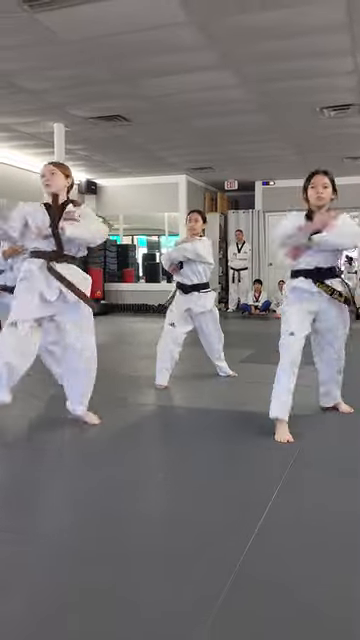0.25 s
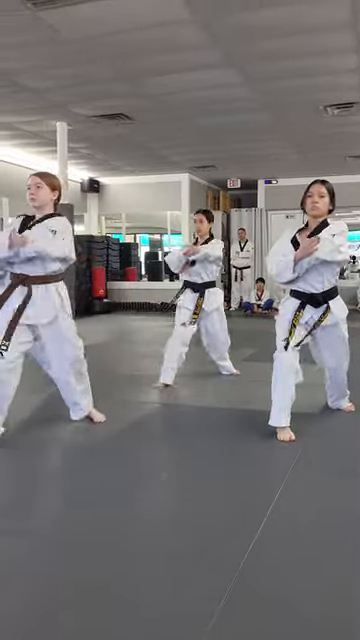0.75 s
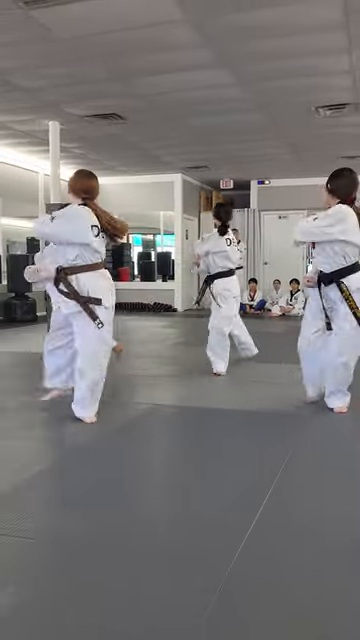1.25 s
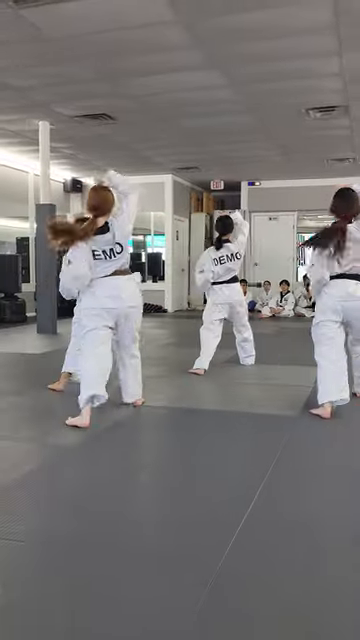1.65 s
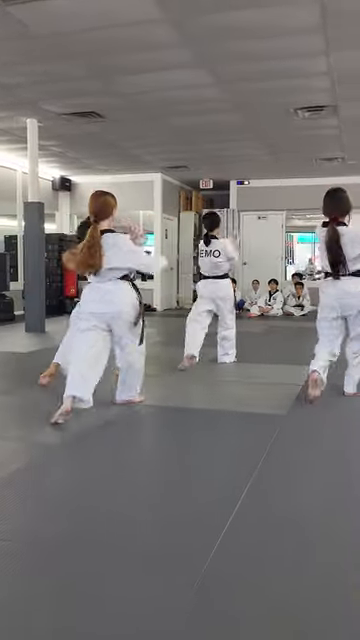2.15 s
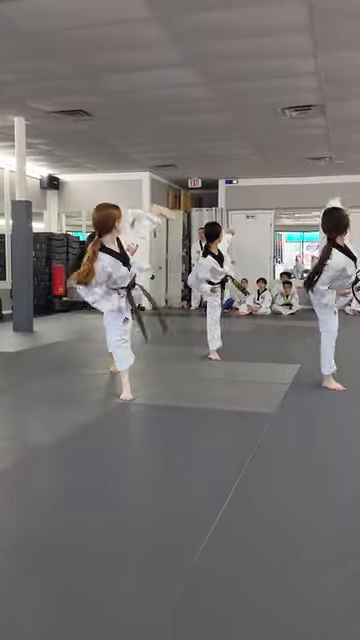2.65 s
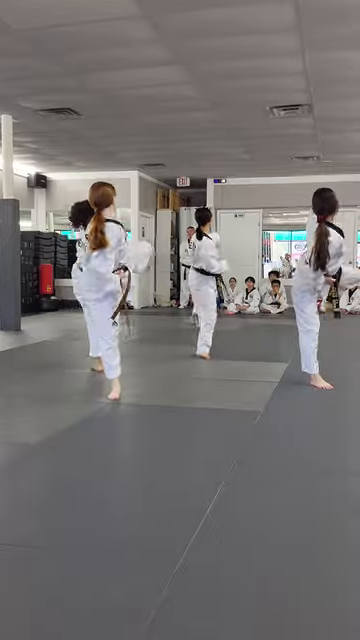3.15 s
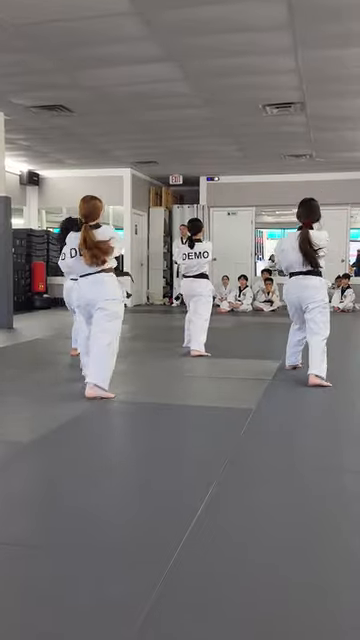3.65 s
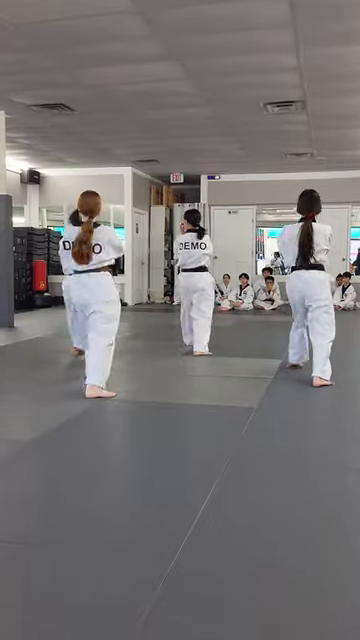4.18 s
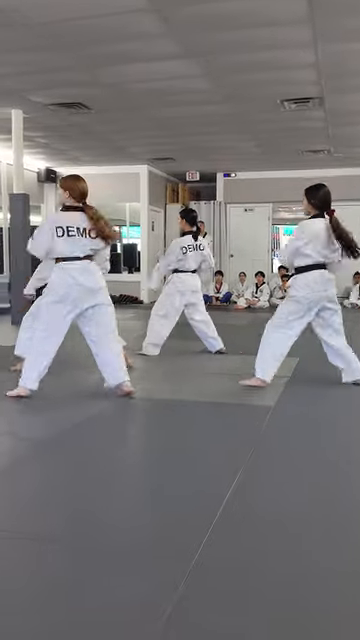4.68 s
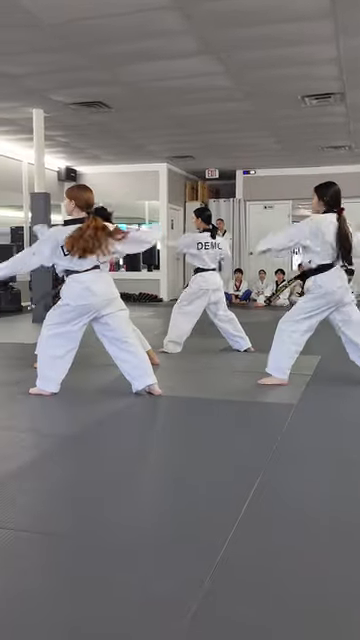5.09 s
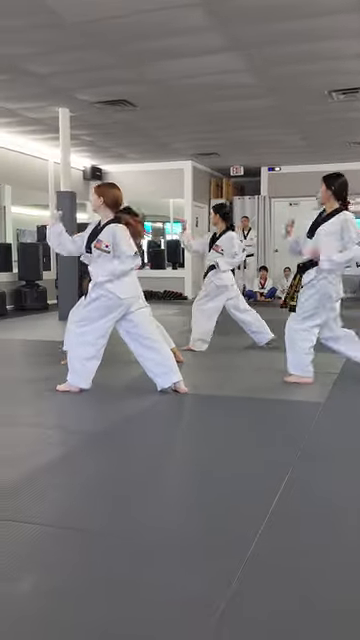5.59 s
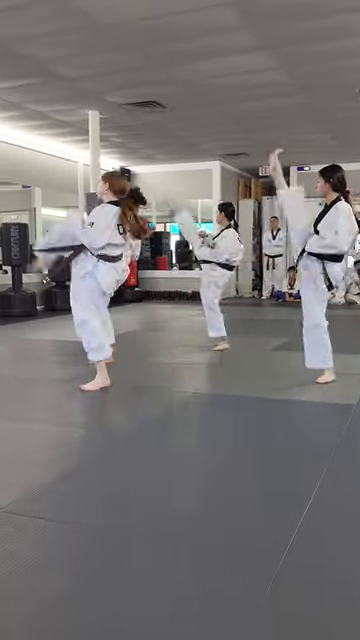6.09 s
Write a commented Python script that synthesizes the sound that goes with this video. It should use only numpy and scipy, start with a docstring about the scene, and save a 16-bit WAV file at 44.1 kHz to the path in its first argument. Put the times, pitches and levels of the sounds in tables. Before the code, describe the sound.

Fabric snaps, hollow pops and barefoot thuds burst twice amid softer swishes and rustles, over faint ventilation rumble in a moderately echoing gym.

```python
"""A light stir of cloth comes first, then a burst of cloth cracks, hollow pops and foot thuds.
A group drills kicks and steps barefoot on a foam mat in a low gym, a few metres from a phone.
Cloth is coloured random ticks, heels ring damped floor modes, pops are single damped rings.
Decaying noise bands make the gym; filtered noise and a wavering tone make the ventilation.
Two microphone ports colour it all; the right one rings near 6 kHz."""
import sys
import numpy as np
from scipy import signal
from scipy.fft import rfft, irfft
from scipy.io import wavfile
from scipy.ndimage import uniform_filter1d

SR = 44100
rng = np.random.default_rng(int(sys.argv[2]) if len(sys.argv) > 2 else 0)


def unload_audio(sound):
    """Save the sound as a 16-bit wav file, at the path given as the first command line argument."""
    columns = np.transpose(np.atleast_2d(sound))
    # keep every value between -1 and 1, then stretch to whole-number steps
    steps = np.round(np.clip(columns, -1, 1) * 32767)
    wavfile.write(sys.argv[1], SR, steps.astype(np.int16))


N = 279132
T = np.arange(N) / SR  # time axis in s

# kicks, turns and strides of the group: (peak time [s], build-up [s], dying away [s],
# crisp rustle [dB], heavy flap [dB], floor shuffle [dB])
MOVES = [(0.22, 0.055, 0.22, -43, -28.5, -49), (0.36, 0.17, 0.2, -35.5, -33.5, -33.5),
         (0.98, 0.28, 1, -55, -55.5, -50), (1.36, 0.17, 0.19, -48.5, -59.5, -62),
         (1.64, 0.26, 0.19, -44, -42.5, -44), (2.0, 0.081, 0.27, -55, -57.5, -66),
         (2.26, 0.61, 0.28, -53, -50.5, -54), (2.63, 0.59, 0.2, -45.5, -45.5, -43.5),
         (3.42, 0.2, 0.049, -50.5, -72, -47), (3.636, 0.23, 0.26, -38.5, -31.5, -35.5),
         (4.34, 0.23, 0.35, -51, -53.5, -66), (4.8, 0.18, 0.22, -47.5, -39, -38),
         (5.28, .17, 0.47, -47.5, -44, -40.5), (5.73, 0.083, 1, -54, -52, -58),
         (6.06, 0.48, 0.75, -46.5, -43.5, -38.5)]
# background stir of cloth under the moves, rising and falling: (time [s], crisp rustle [dB],
# airy rustle [dB], heavy flap [dB])
STIR = [(0, -55.5, -65, -61), (.5, -76, -81, -69), (.85, -54.5, -67, -83), (.95, -57.5, -69, -64),
        (1.8, -60, -67, -77), (2.8, -60.5, -74, -55.5), (3.3, -57.5, -61.5, -57.5), (3.95, -62, -85, -106),
        (4.2, -61.5, -70, -59.5), (4.55, -84, -78, -76), (5.1, -59, -71, -86), (5.62, -58, -67, -79),
        (6.33, -63, -63, -59)]
# sleeves and legs sweeping close by: (time [s], level [dB], body against rustle [dB],
# air against rustle [dB], length [s])
SWISHES = [(0.083, -48, -2, -6, 0.15), (1.051, -46.5, -2.5, -3.5, 0.14), (1.144, -37, -22, -7, 0.061),
           (1.265, -53.5, -6, 1, 0.19), (1.51, -37.5, -10, -9, 0.13), (2.279, -38, -14, 0, 0.057),
           (2.609, -54, 17, -14, 0.25), (4.29, -39.5, -31, -10, 0.026), (4.351, -44.5, -35, -9, 0.13),
           (4.587, -41.5, -3, -9, 0.27), (5.172, -55, 16, -21, 0.31), (5.952, -48, 10.5, -15, 0.21),
           (6.205, -48.5, 14, -17, 0.14)]
# cloth pulled taut or slapped: (time [s], crack peak [dB], body against crack [dB], body pitch [Hz],
# length [s])
SNAPS = [(0.19, -15, 6.5, 1890, 0.0041), (0.25, -27, 9, 980, 0.013), (0.314, -25, -24, 563, 0.012),
         (0.3567, -10.5, -3, 1520, 0.0059), (0.39, -18, 4, 1660, 0.0037), (0.399, -29, 6, 1160, 0.0044),
         (1.566, -26, -27, 820, 0.0066), (1.621, -26, -24, 615, 0.0033), (2.089, -32.5, -16, 536, 0.004),
         (2.17, -35.5, -24, 590, 0.0071), (3.015, -39.5, -15, 605, 0.0061),
         (3.472, -22.5, -1.5, 900, 0.0076), (3.493, -29.5, 1, 503, 0.01), (3.507, -25, -20, 773, 0.0037),
         (3.517, -24.5, -21, 773, 0.008), (3.5775, -23.5, 1.5, 2300, 0.003),
         (3.583, -21.5, 1, 1400, 0.0047), (3.677, -13.5, -0.5, 1720, 0.007), (3.687, -16.5, 0, 605, 0.0075),
         (3.713, -23, -7, 700, 0.034), (4.72, -39.5, 1.5, 770, 0.018), (5.715, -49, 8.5, 497, 0.035),
         (5.996, -43, 8, 590, 0.022), (6.024, -46, 18, 1080, 0.0052), (6.041, -44.5, 13, 2180, 0.004)]
# air trapped in a fold of cloth or under a sole: (time [s], starting level [dB], starting pitch [Hz],
# t60 [s])
POPS = [(0.191, -19.5, 254, 0.047), (0.205, -19, 466, 0.072), (0.275, -20.5, 352, 0.066),
        (0.316, -16.5, 260, 0.083), (0.359, -16.5, 671, 0.06), (0.392, -18, 696, 0.042),
        (2.682, -31, 753, 0.081), (3.057, -40.5, 768, 0.031), (3.22, -47, 533, 0.16),
        (3.373, -25, 297, 0.024), (3.458, -41, 1170, .04), (3.578, -11.5, 1230, 0.0092),
        (3.686, -20, 400, 0.031), (5.275, -29, 600, 0.035), (5.392, -36, 1070, .025),
        (5.909, -36, 1150, .025), (2.706, -31.5, 810, 0.035)]
# feet landing: (time [s], thud peak [dB], slap against thud [dB], boost of the deepest floor mode [dB])
STEPS = [(0.187, -35, 16, 1), (0.358, -26.5, 9, 9), (0.399, -26.5, 6.5, -2), (1.337, -45.5, -22, 16),
         (1.659, -34, -3, 10.5), (2.271, -40.5, -2.5, 8), (2.656, -29, -0.5, 13), (2.699, -36.5, 1, -1),
         (3.374, -39.5, -9, 1), (3.485, -27, 3, -5), (3.682, -24.5, 5, 5), (4.659, -48, 11, -2),
         (4.79, -35.5, -26, 3), (5.239, -42, 6.5, 11), (5.703, -38, -3, 18), (5.846, -40, -20, 20),
         (6.019, -31, -16, 15), (6.228, -43.5, 8, 8)]
# resonances of the floor: (mean frequency [Hz], level [dB], t60 [s])
FLOOR_MODES = [(70, -8, 0.16), (80.8, -14.5, 0.52), (112.4, -3.5, 0.16), (176.1, -6, 0.17),
               (244.5, -3, 0.15), (298, -7, 0.12)]
# spectrum of scraping fibres: (frequency [Hz], level [dB])
CRISP = [(900, -13.5), (2200, -8), (3500, -6.5), (5000, -3.5), (8800, 3.5), (10500, -1.5), (13000, -35.5)]
# spectrum of the highest, airy rustle: (frequency [Hz], level [dB])
AIRY = [(8500, -37), (10500, 0), (12500, 6), (16000, 9.5)]
# spectrum of flapping cloth, also of the sole's slap: (frequency [Hz], level [dB])
FLAP = [(40, -64), (120, -10), (250, -1), (420, -6), (720, -6.5), (900, -9.5), (1300, -14), (2200, -18.5),
        (4500, -27), (7000, -37.5)]
# spectrum of creasing cloth: (frequency [Hz], level [dB])
CRUMPLE = [(600, -18), (1500, -1.5), (3500, -11.5)]
# spectrum of soles dragging on the mat: (frequency [Hz], level [dB])
SHUFFLE = [(20, -45), (45, -26.5), (65, 5), (120, -4), (200, -5), (350, -34.5)]
# unevenness of the flap: (depth [dB], changes per second [1/s])
FOLDS = (3.7, 22)
# reverberation time of the gym: (frequency [Hz], t60 [s])
GYM_T60 = [(100, 1), (300, 0.4), (1000, 0.51), (4000, 0.57), (7000, 0.15), (12000, 0.2)]
# spectrum of the duct rumble: (frequency [Hz], level [dB])
VENT = [(20, -3), (45, -5), (70, 3), (120, 2), (165, -14.5), (400, -36.5), (1000, -38), (3000, -49),
        (16000, -59)]
# the hum swells and fades: (time [s], level [dB])
HUM = [(0.0, -57.5), (0.41, -47), (0.65, -68), (1.95, -50), (2.1, -56), (3.49, -59), (3.61, -62),
       (4.32, -64), (6.33, -52)]
# response of the microphone ports: (frequency [Hz], left [dB], right [dB])
PORTS = [(2500, 2, 2), (4520, 2, 7.5), (5040, -0.5, 10.5), (6180, -4, 15.5), (7970, -4.5, 6),
         (8770, -29, -3), (8960, -4, -5), (10600, -15, -0.5), (13300, -8, 2), (15800, -45, -7)]

MOVE_RANGE_DB = 20  # level change over the build-up and over the dying away
MOVE_ROUND = 1.273  # exponent; over 1: a fuller crest and a quicker end
MOVE_AIR_DB = -8.5  # airy rustle against crisp rustle
STIR_SHUFFLE_DB = -63
CRUMPLE_DB = -17  # creasing cloth against heavy flap
SNAP_AIR_DB = -28  # air against crack
VENT_DB, HUM_HZ = -51.5, 117.4  # rumble level before the ports; centre of the wavering hum
PORT_GAP_M = 0.172
OFF_AXIS = .12  # sine of the bearing of the places on the mat
SOUND_SPEED = 343  # m/s
CEILING = .85  # saturation level, full scale = 1
TOP_HZ = 15850


def movement():
    """Friction noise as dense random impulses: fibres scrape, cloth flaps and creases, soles drag."""
    s, rise, fall, *peaks = columns(MOVES)
    from_peak = np.maximum((s - T) / rise, (T - s) / fall)
    power_shape = undb(-MOVE_RANGE_DB * from_peak ** MOVE_ROUND) ** 2
    moves = undb(np.hstack(peaks).T) ** 2 @ power_shape  # power of each layer

    # unrelated sounds add in power
    stir_s, *stir_levels = np.transpose(STIR)
    stir, stir_air, stir_flap = (undb(np.interp(T, stir_s, db)) ** 2 for db in stir_levels)
    crisp = np.sqrt(moves[0] + stir)
    airy = np.sqrt(moves[0] * undb(MOVE_AIR_DB) ** 2 + stir_air)
    flap = np.sqrt(moves[1] + stir_flap)
    shuffle = np.sqrt(moves[2] + undb(STIR_SHUFFLE_DB) ** 2)

    fibres = grains((2, N), rate=20000, spread_db=0.0) * undb(2.66 * walk(21.86))
    folds = grains((2, N), rate=2500, spread_db=1.5) * undb(1.7 * walk(25))
    creases = grains((2, N), rate=900, spread_db=2.0)
    soles = grains((2, N), rate=400, spread_db=-2.0)

    out = crisp * texture(fibres, CRISP, 3500, 9000)
    out = out + airy * texture(fibres, AIRY, 9500, 15500)
    out = out + flap * clumps(texture(folds, FLAP, 250, 1500), *FOLDS)
    out = out + flap * undb(CRUMPLE_DB) * texture(creases, CRUMPLE, 900, 3000)
    return out + shuffle * texture(soles, SHUFFLE, 45, 200)


def swishes():
    """Amplitude-modulated fibre noise rises and decays with each sweep, too near for much reverberation."""
    size = SR // 3
    s, level_db, body_db, airy_db, length = columns(SWISHES)
    phase = np.minimum(T[:size] / np.clip(length, .005, .3), 1)
    late = np.minimum(0.28 + 1.96 * length, 1)  # a flick starts sharply, a long sweep builds up
    envelope = np.sin(np.pi * phase ** late) ** 2 * np.exp(-phase)
    sides = []
    for _ in range(2):
        ticks = grains((len(s), size), rate=13000, spread_db=0.0)
        sweep = cloth(ticks, colour(ticks, FLAP), body_db, airy_db, np.std) * envelope
        sides.append(lay(s[:, 0], undb(level_db) * sweep, count=1)[0])
    return diffuse(np.array(sides)) * undb(2.7 * walk(60))  # the brushing is uneven


def snaps(tails):
    """Impulsive radiation: a short run of ticks gives a bright crack and a duller body of displaced air."""
    size = SR // 8
    s, peak_db, body_db, body_hz, length = columns(SNAPS)
    phase = T[:size] / np.clip(length, .002, .03)
    shape = np.minimum(phase / 0.9, 1) * np.exp(-phase ** 1.07)
    ticks, other = (grains((len(s), size), rate=8000, spread_db=2.0) * shape for _ in range(2))
    body = np.array([colour(x, body_spectrum(hz)) for x, hz in zip(ticks, body_hz[:, 0])])
    # a wide sheet of cloth cracks all over: each port hears other fibres, both hear the same body
    sides = []
    for side_ticks in (ticks, other):
        snap = cloth(side_ticks, body, body_db, SNAP_AIR_DB, row_peak)
        sides.append(lay(s[:, 0], undb(peak_db) * snap, len(tails)))
    left, right = sides
    return reverberate(left, tails, wet_db=-6.5, right=right)


def body_spectrum(hz):
    """Broad resonance of displaced air: a spectral maximum at hz falling off on both sides."""
    return [(hz / 12, -45), (hz / 3, -11), (hz / 0.89, -5), (hz, 0), (hz * 1.31, -5), (hz * 6, -16)]


def pops(tails):
    """Damped cavity oscillation: trapped air rings once, briefly, sagging a little in pitch."""
    t = T[:SR // 8]
    s, peak_db, hz, t60 = columns(POPS)
    tone = np.sin(2 * np.pi * hz * t * (1 - 1.64 * t))
    onset = np.minimum(t * hz / 0.8, 1)
    ring = tone * onset * undb(peak_db - 60 * t / np.maximum(t60, .01))
    places = lay(s[:, 0], ring, len(tails))
    return reverberate(places, tails, wet_db=-7.0, right=places)


def steps(tails):
    """Modal excitation: a soft heel push rings the floor's damped modes; the sole slaps the foam as noise."""
    t = T[:SR // 2]
    s, peak_db, slap_db, deep_db = columns(STEPS)
    ring = 0
    for k, (hz, db, t60) in enumerate(FLOOR_MODES):
        detune = rng.standard_normal((len(s), 1))  # every spot on the floor rings a little differently
        level = undb(db + deep_db * (k == 0) - 60 * t / t60)
        ring = ring + level * np.sin(2 * np.pi * hz * (1 + 0.056 * detune) * t)
    thud = colour(ring * np.minimum(t / 0.0086, 1), [(25, -23.5), (55, 5.0), (400, 8.0)])
    slap_shape = np.minimum(t / 0.0126, 1) * undb(-60 * t / 0.073)
    slap = colour(rng.standard_normal(thud.shape) * slap_shape, FLAP)
    thud, slap = (x / row_peak(x) for x in (thud, slap))
    places = lay(s[:, 0], undb(peak_db) * (thud + undb(slap_db) * slap), len(tails))
    return reverberate(places, tails, wet_db=-0.5, right=places)


def gym(count=3):
    """Exponential decay of a diffuse field: fading noise in octave bands, unit mean energy per place."""
    t, tail = T[:SR * 3 // 4], 0
    noise = np.array([diffuse(rng.standard_normal((2, len(t)))) for _ in range(count)])
    for hz in 63 * 2. ** np.arange(8):
        top = hz * np.sqrt(2) * (1 + .6 * (hz > 8000))  # the highest band is widened
        band = signal.butter(3, [hz / np.sqrt(2), top], "bandpass", fs=SR, output="sos")
        t60 = on_log(hz, GYM_T60, column=1)
        # each band reads the noise from its own start, so that neighbours do not cancel
        part = signal.sosfilt(band, np.roll(noise, int(hz), axis=-1))
        tail = tail + part * undb(-60 * t / t60) / np.sqrt(t60)
    tail = tail * np.clip((t - .003) / 0.0018, 0, 1)  # first reflections arrive after the direct sound
    # early echoes are separate and uneven, later ones blend
    uneven = np.array([walk(250)[:len(t)] for _ in range(count)])[:, None]
    tail = tail * undb(6.6 * uneven * np.exp(-t / 0.042))
    return tail / np.sqrt(np.mean(np.sum(tail ** 2, axis=-1)))


def reverberate(places, tails, wet_db, right):
    """Superposition of direct and reflected sound; right is what the right port gets directly."""
    wet = signal.fftconvolve(places[:, None], tails, axes=-1).sum(axis=0)[:, :N]
    # a place off to one side reaches one port first
    delay = round(OFF_AXIS * PORT_GAP_M / SOUND_SPEED * SR)
    lags = rng.choice([-1, 1], len(places)) * delay
    direct = [places.sum(axis=0), sum(np.roll(x, lag) for x, lag in zip(right, lags))]
    return np.array(direct)[:, :N] + undb(wet_db) * wet


def ventilation():
    """Broadband flow noise in the duct swells a little; the motor hum wavers in frequency and level."""
    air = diffuse(colour(rng.standard_normal((2, N)), VENT)) * undb(1.0 * walk(4.52))
    hum_phase = 2 * np.pi * np.cumsum(HUM_HZ + 5.0 * walk(12)) / SR
    hum_db = np.interp(T, *np.transpose(HUM)) + 4.65 * walk(16)
    hum = np.sqrt(2) * np.sin(hum_phase) * undb(hum_db)
    return air * undb(VENT_DB) / np.std(air) + hum


def cloth(ticks, body, body_db, airy_db, measure):
    """Spectral superposition: crisp rustle, body and air, each set to its level in its own band."""
    parts = [(colour(ticks, CRISP), 0, 3500, 9000),
             (body, body_db, 300, 2500),
             (colour(ticks, AIRY), airy_db, 9500, 15500)]
    total = 0
    for part, rel_db, lo_hz, hi_hz in parts:
        in_band = heard(part.ravel(), lo_hz, hi_hz).reshape(part.shape)
        total = total + undb(rel_db) * part / measure(in_band)
    return total


def texture(source, points, lo_hz, hi_hz):
    """Diffuse field of coloured grains from all over the mat, at unit level in the given band."""
    field = diffuse(colour(source, points))
    return field / np.std(heard(field, lo_hz, hi_hz))


def clumps(x, patchy_db, rate):
    """Independent modulation: third-octave bands swell and sink as folds of cloth open and close."""
    edges = 140 * 2 ** (np.arange(11) / 3)
    out = x
    for lo, hi in zip(edges[:-1], edges[1:]):
        band = signal.sosfilt(signal.butter(1, [lo, hi], "bandpass", fs=SR, output="sos"), x)
        gain = undb(patchy_db * walk(rate) - patchy_db ** 2 / 9)  # lowered to offset the swells
        out = out + band * (gain - 1)
    return out


def grains(shape, rate, spread_db):
    """Random point process: Gaussian ticks at rate per second, with an added random spread in dB."""
    struck = rng.random(shape) < rate / SR
    spread = undb(spread_db * np.minimum(rng.exponential(size=shape), 4))
    return struck * rng.standard_normal(shape) * spread


def walk(rate):
    """Slow random modulation: levels held 1 / rate s and slewed twice; spread near 1."""
    k = int(SR / rate)
    held = np.repeat(rng.standard_normal(N // k + 1), k)
    return 1.3 * uniform_filter1d(uniform_filter1d(held, k), k)[:N]


def diffuse(pair):
    """Spatial coherence: two unrelated sounds become alike only for waves longer than the port gap."""
    hz = np.arange(pair.shape[1] // 2 + 1) * SR / pair.shape[1]
    alike = .96 * np.clip(np.sinc(2 * hz * PORT_GAP_M / SOUND_SPEED), 0, 1)
    alike = alike * (hz < SOUND_SPEED / (2 * PORT_GAP_M))
    first, second = rfft(pair)
    mid = np.sqrt(1 + alike) * (first + second) / 2
    side = np.sqrt(1 - alike) * (first - second) / 2
    return irfft(np.array([mid + side, mid - side]), pair.shape[1])


def lay(times, sounds, count):
    """Superposition in time: sounds at their times, shared out over the places on the mat."""
    places = np.zeros((count, N + sounds.shape[1]))
    for k, (s, sound) in enumerate(zip(times, sounds)):
        start = int(s * SR)
        places[k % count, start:start + len(sound)] += sound
    return places[:, :N]


def columns(table):
    """One upright array for each table column, so that every event is a row."""
    return [c[:, None] for c in np.transpose(table)]


def row_peak(x):
    """Peak amplitude of each row."""
    return np.abs(x).max(axis=1, keepdims=True)


def undb(db):
    """Amplitude ratio of a level in dB."""
    return 10 ** (np.asarray(db) / 20)


def on_log(hz, points, column):
    """A table column interpolated on a log-frequency axis."""
    table = np.array(points, float)
    return np.interp(np.log(np.maximum(hz, 1)), np.log(table[:, 0]), table[:, column])


def response(points, column=1, size=4096):
    """Minimum-phase principle: a causal impulse response of the given colour, from the folded cepstrum."""
    level_db = on_log(np.arange(size // 2 + 1) * SR / size, points, column)
    cep = irfft(level_db * np.log(10) / 20)
    cep[1:size // 2] *= 2
    cep[size // 2 + 1:] = 0
    return irfft(np.exp(rfft(cep)))[:size // 2]


def colour(x, points):
    """Linear filtering by convolution with the response of the given spectrum."""
    taps = response(points).reshape((1,) * (x.ndim - 1) + (-1,))
    return signal.fftconvolve(x, taps, axes=-1)[..., :x.shape[-1]]


def ports(x):
    """Linear filtering of each channel by the resonances of its own microphone port."""
    taps = np.array([response(PORTS, column=c, size=1024) for c in range(1, 3)])
    return signal.fftconvolve(x, taps, axes=1)[:, :x.shape[1]]


def heard(x, lo_hz, hi_hz):
    """Band-pass analysis of the sound as the mean of both microphones."""
    band = signal.butter(2, [lo_hz, hi_hz], "bandpass", fs=SR, output="sos")
    return signal.sosfilt(band, ports(x * np.ones((2, 1))).mean(axis=0))


def scene():
    """Linear superposition of all sources, the impacts sharing one set of reverberant tails."""
    tails = gym()
    moving_cloth = movement() + swishes()
    return moving_cloth + snaps(tails) + steps(tails) + ventilation() + pops(tails)


def record(dry):
    """Transduction: the ports colour the sound, saturation rounds the loudest cracks, the top is cut."""
    rounded = CEILING * np.tanh(ports(dry) / CEILING)
    return signal.sosfilt(signal.ellip(12, .3, 90, TOP_HZ, fs=SR, output="sos"), rounded)


dry = scene()
out = record(dry)
unload_audio(out)
```